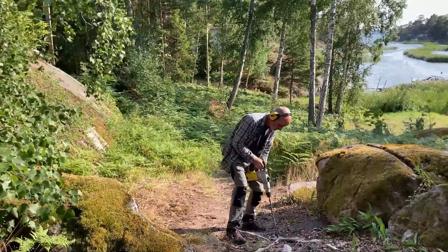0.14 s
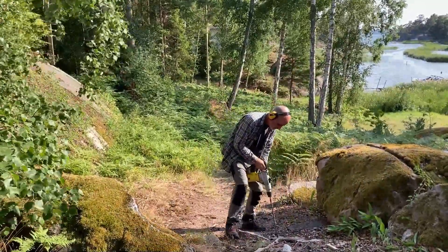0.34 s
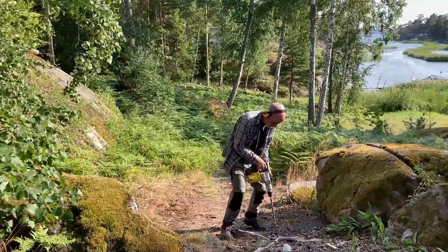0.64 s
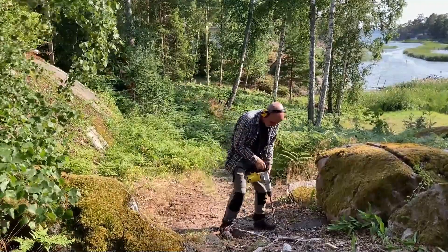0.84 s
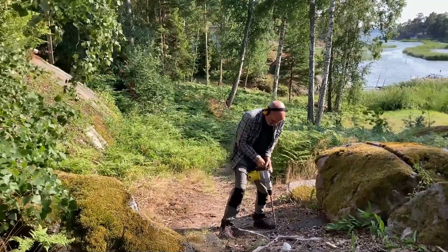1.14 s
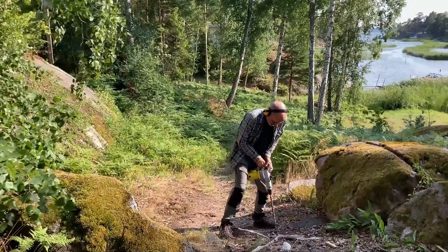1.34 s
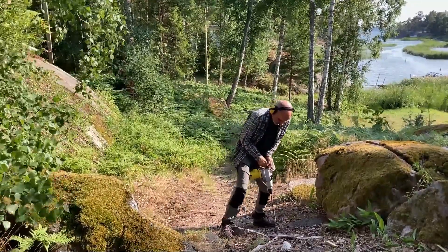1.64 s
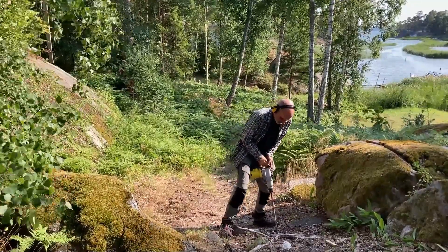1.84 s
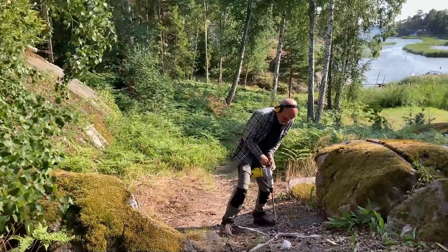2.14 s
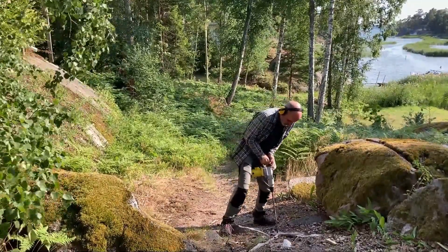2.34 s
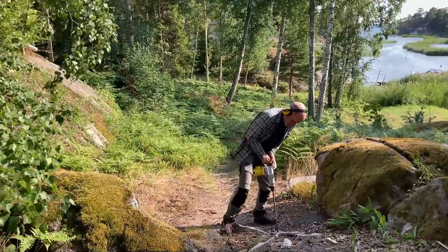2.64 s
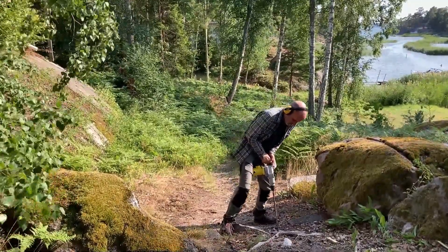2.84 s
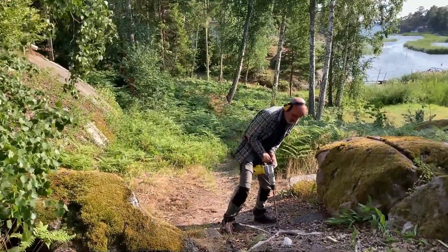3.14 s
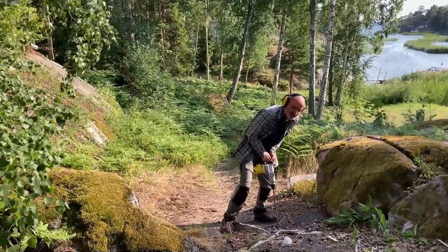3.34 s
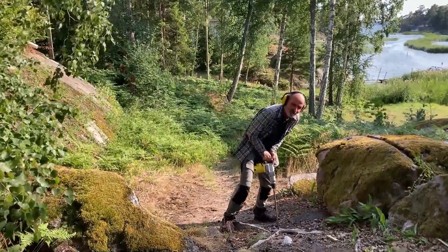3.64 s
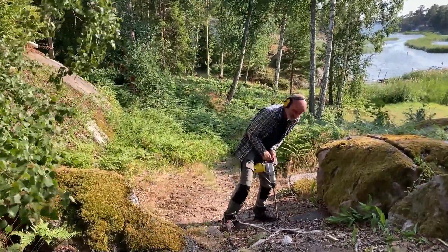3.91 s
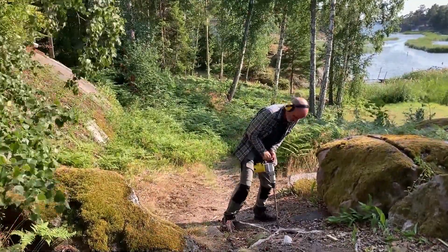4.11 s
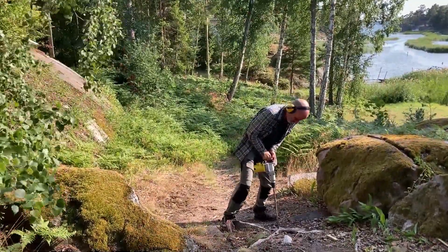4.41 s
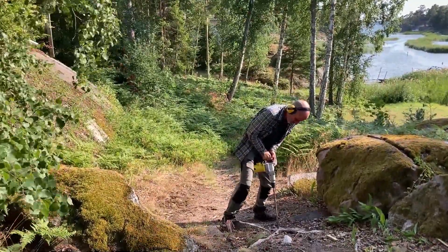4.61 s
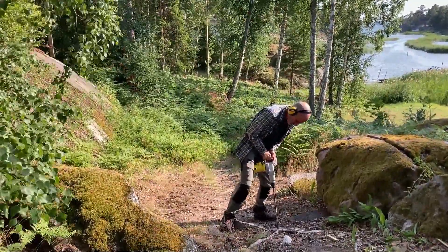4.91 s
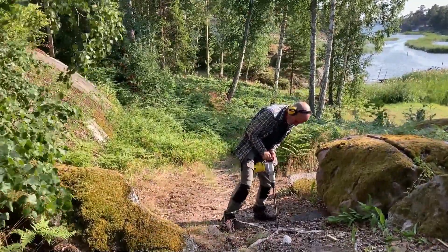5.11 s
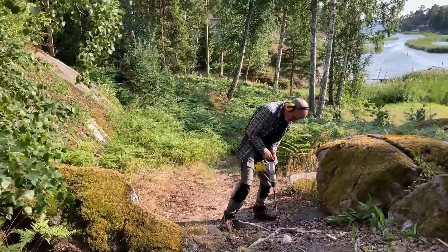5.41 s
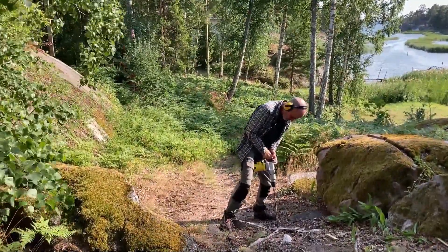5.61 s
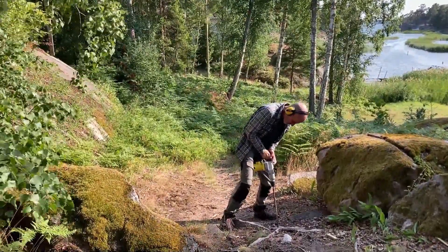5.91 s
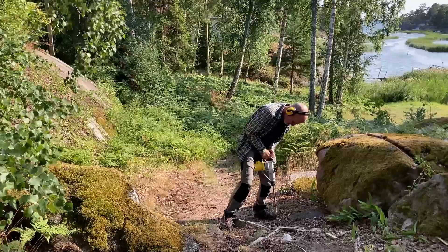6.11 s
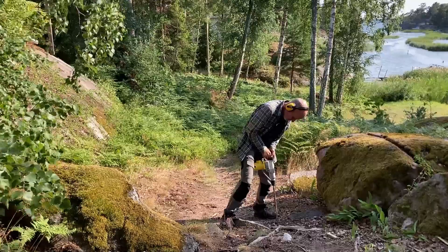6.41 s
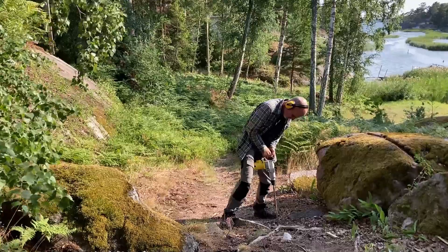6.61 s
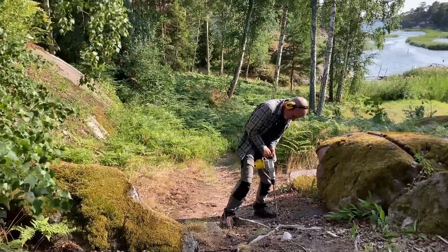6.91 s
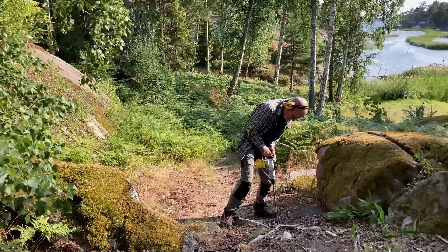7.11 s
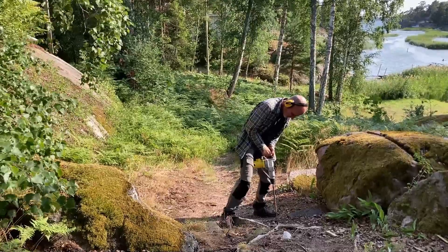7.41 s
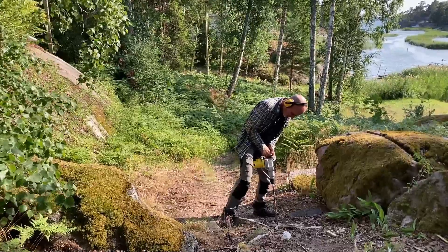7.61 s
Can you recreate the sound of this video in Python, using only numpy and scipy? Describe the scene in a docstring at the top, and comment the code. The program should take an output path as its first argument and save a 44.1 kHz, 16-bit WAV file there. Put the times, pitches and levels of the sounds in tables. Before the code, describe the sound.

Wind thumps and faint leaf rustle come first, with one small twig crack. Then a rotary hammer's motor whines upward, squealing briefly before its bit bites into bedrock. The rapid hammering, about sixty blows a second, blurs into a dense bright metallic clatter with grinding grit and thin gear whine. Deep gust slaps still hit the unshielded microphone, mostly early on. A nearby boulder adds a dull early echo; there is little other reverberation.

```python
"""An electric rotary hammer bores into bedrock: about sixty times a second a piston drives the steel bit,
which bounces and grinds, and each contact rings through resonances of steel and rock.
Before that the motor winds up with a short squeal as its gear whine sweeps through housing resonances.
Around it, gusts rumble and slap the microphone as shaped low noise and single pulses,
leaves hiss as broad noise, and a twig snaps once as a decaying burst."""
import sys
import numpy as np
from scipy import signal
from scipy.fft import rfft, irfft, next_fast_len
from scipy.io import wavfile
from scipy.ndimage import uniform_filter1d

SR = 44100
rng = np.random.default_rng(int(sys.argv[2]) if len(sys.argv) > 2 else 0)


def wav_out(sig):
    """Save sig, one row per channel (or a flat mono array), as 16-bit PCM at SR to the path in sys.argv[1]."""
    wavfile.write(sys.argv[1], SR, np.round(np.clip(np.atleast_2d(sig).T, -1, 1) * 32767).astype(np.int16))


N = 341775
TIME = np.arange(N) / SR
SIZE = next_fast_len(N + SR // 2, True)
FREQS = np.maximum(np.arange(SIZE // 2 + 1) * SR / SIZE, 1)
TRIGGER_S = 1.54
MESHES_PER_BLOW = 26


def from_db(db):
    """Logarithmic level: decibels to amplitude gain."""
    return 10 ** (np.asarray(db) / 20)


def rms_one(x):
    """Power normalisation: scale to unit rms."""
    return x / np.sqrt(np.mean(x ** 2) + 1e-20)


def in_time(rows):
    """Linear interpolation: one curve per column, a value at every sample."""
    s, *columns = np.transpose(rows)
    return [np.interp(TIME, s, column) for column in columns]


def over_hz(points):
    """Spectral envelope: levels joined by straight lines in log frequency."""
    hz, db = np.transpose(points)
    return np.interp(np.log(FREQS), np.log(hz), db)


def filtered(x, response):
    """Linear filtering: multiply the spectrum by a frequency response."""
    return irfft(rfft(x, SIZE) * response, SIZE)[..., :N]


def causal(db):
    """Minimum phase: a folded cepstrum makes the response ring only after a blow."""
    cepstrum = irfft(np.log(from_db(db)), SIZE)
    cepstrum[1:SIZE // 2] *= 2
    cepstrum[SIZE // 2 + 1:] = 0
    return np.exp(rfft(cepstrum))


def band(hz, q=1):
    """Simple resonator: unit gain at its centre, falling to both sides."""
    return 1 / (1 + 1j * (FREQS / hz - hz / FREQS) * q)


def ring(force, hz, width_hz):
    """Driven resonance: one mode excited by a force, at unit rms."""
    return rms_one(filtered(force, band(hz, hz / width_hz)))


def noise(spectrum):
    """Coloured noise: random pressure with a given spectral envelope, at unit rms."""
    return rms_one(filtered(rng.standard_normal(N), from_db(over_hz(spectrum))))


def drift(rate_hz):
    """Slow random modulation: low-passed noise of unit spread, drawn at every eighth sample."""
    slow = rfft(rng.standard_normal(SIZE // 8))
    slow = rms_one(irfft(slow / (1 + (FREQS[:len(slow)] / rate_hz) ** 2)))
    return np.interp(np.arange(N) / 8, np.arange(len(slow)), slow)


def bounded_drift(rate_hz):
    """Saturation: slow random modulation kept between -1 and 1."""
    return np.tanh(drift(rate_hz))


def fade(clicks, seconds):
    """Exponential decay: each click starts one with this time constant."""
    return signal.lfilter([1], [1, -np.exp(-1 / (seconds * SR))], clicks + 1e-18)


def swell(start_s, length_s, rise_s, fall_s):
    """Amplitude envelope of height 1: linear attack, hold, exponential release."""
    attack = np.clip((TIME - start_s) / rise_s, 0, 1)
    return attack * np.exp(-np.clip((TIME - start_s - length_s) / fall_s, 0, 30))


# level of sound given apart to left and right: frequency_hz, level_db (against the shared sound)
SIDES_SPECTRUM = [(200, -22), (700, -7), (1500, -5), (2400, -2.5), (3300, 3.5), (5800, -0.5), (6800, -4),
                  (11400, -52), (15000, -15)]
# phase of left against right in the shared sound: frequency_hz, left_lead_rad
LEFT_RIGHT_PHASE = [(0, 0), (2000, .1), (3200, 1.1), (3800, 5.4), (4700, 6.1), (5800, 7.2), (6900, 6.3),
                    (8000, 4.8), (9200, 3.14), (11400, 0), (13600, -3.14), (15600, -6.3)]


def stereo(shared, apart):
    """Interchannel phase and coherence: shared sound gets a set left-right phase, the rest is added."""
    lead = np.interp(FREQS, *np.transpose(LEFT_RIGHT_PHASE))
    apart_ratio = from_db(over_hz(SIDES_SPECTRUM))
    shared_gain = 1 / np.sqrt(1 + apart_ratio ** 2)
    left_right = np.exp(.5j * lead * np.array([[1], [-1]]))
    return filtered(shared, shared_gain * left_right) + filtered(apart, shared_gain * apart_ratio)


# colour of the leaves: frequency_hz, relative_level_db (per Hz)
LEAF_SPECTRUM = [(60, -14), (300, 2.5), (700, -2), (1500, -5.5), (2500, -5.5), (4500, -1.5), (7000, -4.5),
                 (9500, 2.5), (11000, -3.5), (13000, -17), (16000, -28)]
# cracks of a twig underfoot: start_s, level_db, decay_s
TWIG_SNAPS = [(.379, -42, 0.01)]


def forest(leaves_db=-50.0, flutter_db=2.0):
    """Broadband noise and decaying burst: leaves hiss on every side; a twig snaps."""
    apart = np.array([noise(LEAF_SPECTRUM), noise(LEAF_SPECTRUM)])
    leaves = stereo(noise(LEAF_SPECTRUM), apart)
    leaves = leaves * from_db(leaves_db + flutter_db * bounded_drift(29))
    snap = sum(from_db(db) * (TIME > s) * np.exp(-np.abs(TIME - s) / decay)
               for s, db, decay in TWIG_SNAPS)
    return leaves + snap * noise([(300, -12), (900, 8), (3200, -1), (5000, -22), (12000, -35)])


# wind rumble: frequency_hz, relative_level_db (per Hz)
RUMBLE_SPECTRUM = [(20, -38), (35, -12), (50, -3), (64, 3), (105, -5), (160, -12.5), (250, -23),
                   (400, -35.5), (800, -76)]
# light air between gusts: time_s, level_db (before the random lumps)
BREEZE_LEVEL = [(0, -36), (.9, -43), (1.8, -34.5), (2.1, -44), (3.7, -47), (4.8, -39), (6.7, -52),
                (7.75, -49)]
# gusts: start_s, length_s, level_db (before the random lumps)
GUST_EVENTS = [(0.263, 0.11, -33), (0.508, 0.32, -30.5), (0.957, 0.5, -32.5), (1.325, 0.16, -29),
               (1.52, 0.18, -27.5), (1.86, 0.1, -28.5), (2.131, 0.04, -30.5), (2.215, 0.13, -29.5),
               (2.376, 0.29, -28), (2.685, 0.18, -35.5), (2.917, .23, -40), (3.426, 0.026, -40),
               (3.879, 0.029, -33.5), (4.156, 0.29, -40.5), (4.641, 0.11, -30.5), (4.91, 0.078, -32.5),
               (5.087, 0.054, -36), (5.2, 0.052, -33.5), (5.376, 0.27, -40), (5.654, 0.061, -32),
               (5.883, 0.034, -40), (6.04, 0.035, -50), (6.18, 0.07, -42), (6.335, 0.15, -43),
               (7.29, 0.12, -39.5)]
# hard buffets: centre_s, level_db (before flutter), half_length_s, pitch_factor (on the colour below)
BUFFET_EVENTS = [(0.544, -32.5, 0.025, 0.65), (0.801, -35.5, 0.015, 1.04), (1.102, -45, 0.022, 1.3),
                 (1.403, -29, 0.077, 0.95), (2.577, -36, 0.011, 1.3)]
# buffet colour: frequency_hz (before the pitch factor), relative_level_db (per Hz)
BUFFET_SPECTRUM = [(50, -26), (130, 6), (220, 1.5), (400, -10.5), (700, -27.5), (1500, -61)]
GUST_RISE_S, GUST_FALL_S = 0.019, 0.031


def wind(evenness=0.93, lump_db=2.1, bright_hz=105, bright_power=0.22, pivot_db=-34.0,
         flutter_db=6.0, ticks_per_s=24, tick_db=9.0, tick_hz=1000):
    """Turbulent pressure: eddies rumble alike in both channels, brighter in stronger flow."""
    breeze_db, = in_time(BREEZE_LEVEL)
    gust_power = sum((from_db(db) * swell(s, length, GUST_RISE_S, GUST_FALL_S)) ** 2
                     for s, length, db in GUST_EVENTS)
    flow = np.sqrt(from_db(breeze_db) ** 2 + gust_power) * from_db(lump_db * bounded_drift(23))
    # evening out the short-term power leaves the flow in charge of the level
    eddies = noise(RUMBLE_SPECTRUM)
    eddies = rms_one(eddies / uniform_filter1d(eddies ** 2, SR // 16) ** (evenness / 2))
    small_eddies = filtered(eddies, 1 / (1 + (bright_hz / FREQS) ** 4))
    eddies = eddies + small_eddies * ((flow / from_db(pivot_db)) ** bright_power - 1)
    # hard buffets reach higher in pitch and flutter
    buffets = 0
    for s, db, half, pitch in BUFFET_EVENTS:
        bump = np.exp(-.5 * ((TIME - s) / half) ** 2)
        buffets = buffets + from_db(db) * bump * noise(np.array(BUFFET_SPECTRUM) * [pitch, 1])
    # faint ticks ride on the gusts
    ticks = filtered(rng.random(N) < ticks_per_s / SR, band(tick_hz) ** 2)
    flutter = from_db(flutter_db * bounded_drift(70))
    return flow * (eddies + from_db(tick_db) * ticks) + buffets * flutter


# single eddies that slap the microphone: start_s, peak_db, brightness_hz
THUMP_EVENTS = [(0.794, -30, 220), (0.978, -24.5, 80), (1.385, -21.5, 330), (1.405, -18.5, 60),
                (1.886, -23.5, 130), (2.274, -15, 330), (2.285, -18, 55), (2.586, -17, 55),
                (3.447, -27, 70), (4.72, -27, 70)]
# the microphone sheds the deepest bass, so each slap swings on for a few cycles
LOW_CUT_HZ = 48


def thumps():
    """Pressure pulse through a high-pass: a sharp push of air, then a deep swing."""
    low_cut = signal.butter(4, LOW_CUT_HZ, "high", fs=SR, output="sos")
    age_s = np.arange(SR // 5) / SR
    out = np.zeros(N)
    for s, db, hz in THUMP_EVENTS:
        rise = 2 * np.pi * hz * age_s
        push = signal.sosfilt(low_cut, rise ** 2 * np.exp(-rise))
        start = int(s * SR)
        out[start:start + len(age_s)] += from_db(db) * push / np.abs(push).max()
    return out


# gear whine at working speed: multiple (of the mesh rate), level_db (rms, before the common gain and fade)
WHINE_LINES = [(1, -49.5), (2, -47.5), (3, -50), (8, -45.5)]
# housing hum at working speed: multiple (of the blow rate), level_db (rms)
HUM_LINES = [(4, -59.5), (6, -65.5), (8, -63.5), (11, -55)]
# the gear whine dulls as the bit sinks into the rock
WHINE_FADE_DB_PER_S = 0.9


def motor(mesh_hz, level_db=3.6, flutter=0.00079, rough_db=1.5, swell_power=7.9):
    """Harmonic series of gear meshing: thin wavering lines over a hum, the high ones only near full speed."""
    carry_db = level_db - WHINE_FADE_DB_PER_S * (TIME - TRIGGER_S)
    angle = 2 * np.pi * np.cumsum(mesh_hz * (1 + flutter * drift(31))) / SR
    near_speed = np.minimum(mesh_hz / 1550, 1) ** swell_power
    whine = 0
    for k, db in WHINE_LINES:
        gain = from_db(db + carry_db + rough_db * drift(11)) * near_speed ** k
        whine = whine + np.sqrt(2) * gain * np.sin(k * angle)
    hum = sum(from_db(db) * np.sin(k * angle / MESHES_PER_BLOW) for k, db in HUM_LINES)
    return stereo(whine, np.array([whine, whine])) + np.sqrt(2) * near_speed * hum


def gears(angle, multiple, roughness, blur_hz):
    """Narrow-band noise around a tone: part steady whine, part smeared by chattering teeth; unit rms."""
    phase = multiple * angle
    smear = drift(blur_hz * multiple) * np.sin(phase) + drift(blur_hz * multiple) * np.cos(phase)
    return np.sqrt(2 * (1 - roughness)) * np.sin(phase) + np.sqrt(roughness) * smear


# housing resonances swept by the whine:
# multiple (of the mesh rate), resonance_hz, width_hz, level_db (rms at the peak, before roughening),
# roughness (0-1)
SQUEAL_RESONANCES = [(1, 950, 83, -36, .3), (1, 1310, 150, -41, 0.4), (2, 1940, 160, -42, .6),
                     (2, 2307, 210, -23.5, 0.46), (2, 2600, 130, -36.5, 0.2), (4, 4480, 300, -41, .7),
                     (4, 5240, 330, -37.5, 0.7), (8, 11500, 700, -48, .3)]
# brief falling whine while the bit seats: time_s, pitch_hz, level_db (rms, before roughening)
SEATING_WHINE = [(1.72, 1003, -56), (1.765, 880, -56), (1.835, 713, -46), (1.93, 630, -66)]
# the loose bit jingles until it seats
JINGLE_DB, JINGLE_S, JINGLE_FALL_S = -41, 0.31, 0.029


def spin_up(mesh_hz, lurch=0.43, steadying_s=0.3, blur_hz=55, rough_db=3.0,
            settle_s=1.0, settle_fall_s=0.21):
    """Swept excitation of resonances: the gears squeal as they pass each one; the loose bit jingles."""
    # while it is slow, the motor lurches with every stroke
    unsteady = np.exp(-np.maximum(TIME - TRIGGER_S, 0) / steadying_s)
    angle = 2 * np.pi * np.cumsum(mesh_hz) / SR
    angle = angle + lurch * unsteady * np.sin(angle / MESHES_PER_BLOW)
    squeal = 0
    for k, hz, width, db, roughness in SQUEAL_RESONANCES:
        resonance = 1 / (1 + ((k * mesh_hz - hz) / width) ** 2) ** 2
        squeal = squeal + from_db(db) * resonance * gears(angle, k, roughness, blur_hz)
    squeal = squeal * swell(TRIGGER_S, settle_s, 0.054, settle_fall_s)
    jingle_envelope = from_db(JINGLE_DB) * swell(TRIGGER_S, JINGLE_S, .003, JINGLE_FALL_S)
    jingle = jingle_envelope * ring(rng.standard_normal(N), hz=2310, width_hz=71)
    falling_hz, falling_db = in_time(SEATING_WHINE)
    seating = (TIME > SEATING_WHINE[0][0]) & (TIME < SEATING_WHINE[-1][0])
    falling_tone = np.sqrt(2) * np.sin(2 * np.pi * np.cumsum(falling_hz) / SR)
    falling = seating * from_db(falling_db) * falling_tone
    roughening = from_db(rough_db * np.array([drift(108), drift(110)]))
    return (squeal + falling) * roughening + jingle


BOULDER_S, BOULDER_DB = .0086, -14.5


def boulder(x):
    """Specular reflection: the rock face beside the drill returns one dull early echo."""
    delay = np.exp(-2j * np.pi * FREQS * BOULDER_S)
    return x + from_db(BOULDER_DB) * filtered(x, delay / (1 + (FREQS / 6000) ** 2))


# free bending modes of the shank: frequency_hz, width_hz, level_db (against the rattle), flicker_db
SHANK_MODES = [(3270, 130, -17.5, 5), (4705, 95, -14.5, 4.5)]
# the shank rubs the side of the hole: start_s, length_s, level_db
RUB_EVENTS = [(2.22, .4, -43), (5.65, 0.81, -47), (6.4, 0.47, -39.5)]
RUB_RISE_S, RUB_FALL_S = 0.057, 0.086


def shank(force, strength_db, pan_db=-0.5):
    """Bending modes of a bar: the long shank sings above the rattle, its highest mode when it rubs."""
    free = 0
    for hz, width, db, flicker_db in SHANK_MODES:
        gain = from_db(strength_db + db + flicker_db * bounded_drift(60))
        free = free + gain * ring(force, hz, width)
    rubbing = sum(from_db(db) * swell(s, length, RUB_RISE_S, RUB_FALL_S) for s, length, db in RUB_EVENTS)
    rubbed = rubbing * ring(force, hz=5295, width_hz=130)
    return (free + rubbed) * from_db([[pan_db], [-pan_db]])


def strikes(turns, offset, jitter_s, spread_db):
    """Impulse train: one click per piston stroke, uneven in time and force within bounds."""
    at_s = np.interp(np.arange(1, int(turns[-1])) + offset, turns, TIME)
    chance = rng.uniform(-1, 1, (len(at_s), 2))
    samples = ((at_s + jitter_s * chance[:, 0]) * SR).astype(int)
    clicks = np.zeros(N)
    clicks[np.clip(samples, 0, N - 1)] = from_db(spread_db * chance[:, 1])
    return clicks


# blows that land square on hard rock: time_s, strength_db (of the click, over the rattle, before filtering)
HARD_BLOW_EVENTS = [(2.671, 25), (3.204, 31), (3.9627, 27), (4.1945, 25), (4.787, 30), (4.8705, 28),
                    (5.101, 25), (5.301, 31), (5.365, 30), (5.632, 29), (6.7155, 28), (6.8276, 30),
                    (6.8925, 24), (7.464, 25)]
# the crack of a blow over its chatter
CRACK_DB = 22
# the tip skips and strikes again straight after each crack
SKIP_S, SKIP_SPREAD_S, SKIP_DB = .0014, .0006, -6


def contact_force(mesh_hz, seated_db, rebound_db=-3.5, crack_hz=2500, chatter_s=0.007, grind_db=-6.5):
    """Impact excitation: blows, rebounds and grinding at the tip of the bit."""
    turns = np.cumsum(mesh_hz * (TIME > TRIGGER_S)) / SR / MESHES_PER_BLOW
    blows = strikes(turns, offset=.5, jitter_s=.00012, spread_db=3.8)
    # the bit springs back against its holder half a stroke later
    blows = blows + from_db(rebound_db) * strikes(turns, offset=-.03, jitter_s=.0007, spread_db=3.8)
    skips = strikes(turns, offset=.5, jitter_s=SKIP_SPREAD_S, spread_db=4.2)
    skips = np.roll(skips, int(SKIP_S * SR))
    # each contact is a crack followed by a few milliseconds of chatter and crushed grit
    steely = band(crack_hz)
    crack = from_db(CRACK_DB) * filtered(blows + from_db(SKIP_DB) * skips, steely)
    chatter = fade(blows, chatter_s) * rng.standard_normal(N)
    grinding = from_db(grind_db) * rng.standard_normal(N)
    force = from_db(seated_db) * (crack + chatter) + grinding
    # short-term levelling: feed then alters the balance of blows and grinding
    rattle = force / np.sqrt(uniform_filter1d(force ** 2, SR // 8))
    hard = sum(from_db(db) * (np.arange(N) == int(s * SR)) for s, db in HARD_BLOW_EVENTS)
    return rattle + filtered(hard, steely)


# broad colour of drill and rock: frequency_hz, relative_level_db (per Hz)
DRILL_SPECTRUM = [(100, -33), (250, -13.5), (400, -17), (610, -16.5), (670, -6.5), (1000, 0.5), (1450, -3),
                  (2400, 2.5), (4000, -3.5), (5600, -5), (7400, -0.5), (9700, -7.5), (12300, -6),
                  (15800, -21.5)]
# resonances and gaps of bit and housing: frequency_hz, width_hz, level_db (over the broad colour)
STEEL_MODES = [(256, 20, 5.5), (400, 63, 5.5), (492, 18, 2), (673, 37, 6), (902, 120, 3.5), (1310, 68, 6),
               (1341, 36, -11), (1510, 29, -7), (1585, 60, 3), (1780, 17, 0), (2215, 33, 7.5),
               (2294, 60, 5.5), (2570, 140, 4.5), (2860, 60, 4.5), (3040, 100, -3.5), (3300, 470, 3.5),
               (3480, 37, 2), (3740, 33, 10), (4100, 50, 5), (4520, 206, 7.5), (5330, 85, 10.5),
               (5350, 280, -7), (10270, 1030, 4.5), (12300, 350, 1)]
# how firmly the man leans on the drill: time_s, feed_db (shifts the blows against the grinding)
FEED_LEVEL = [(2.2, -4.5), (2.7, 0.5), (3.0, -1.5), (3.85, 1), (4.7, 0.5), (5.3, 4.5), (6.1, 0), (7.75, 0)]
# the bit catches solid rock (+) or slips in dust (-):
# start_s, length_s, crunch_db (treble), catch_db (clang, and blows against grinding)
BITE_EVENTS = [(1.88, 0.033, -1.5, 2), (1.93, 0.062, -0.5, -3), (2.593, 0.21, 0.5, 1.5),
               (2.86, 0.19, 0, -1), (3.176, 0.16, 1, 2), (3.37, 0.17, -2, 0.5), (4.71, .07, -1, -1),
               (4.91, 0.035, -1, -2), (5.05, 0.06, 0.5, 1), (6.53, 0.24, 1.5, -0.5), (6.79, 0.07, 1, 0.5),
               (7.37, 0.13, -0.3, 1.5)]
# treble crunch: time_s, level_db (before bites and flicker)
CRUNCH_LEVEL = [(1.8, 2), (2.6, 0), (3.8, 2), (4.7, 0), (5.6, 1.5), (6.75, 0), (7.2, 0), (7.75, 1.5)]
BITE_RISE_S, BITE_FALL_S = 0.0056, 0.034
# blows at neutral feed, and dB gained per dB of feed and per dB of a bite's crunch
BLOW_DB, FEED_FOLLOWS, BITE_FOLLOWS = -24, 0.19, 0.59
# decay of the blurred sound that differs between left and right
BLUR_S = 0.0049


def hammer(mesh_hz, crunch_hz=5500, crunch_flicker_db=0.6, clang_hz=2450, clang_db=0.23,
           clang_flicker_db=1.2, speed_power=1.9):
    """Source and filter: sharp blows and their blurred copies ring through modes of steel and rock."""
    feed_db, = in_time(FEED_LEVEL)
    crunch_db, = in_time(CRUNCH_LEVEL)
    bite_db, catch_db = sum(np.outer(dbs, swell(s, length, BITE_RISE_S, BITE_FALL_S))
                            for s, length, *dbs in BITE_EVENTS)
    strength_db = BLOW_DB + FEED_FOLLOWS * feed_db + BITE_FOLLOWS * bite_db
    force = contact_force(mesh_hz, feed_db + catch_db)
    # noise follows the smoothed energy of the blows, drawn apart for left and right
    blurred = rms_one(np.sqrt(fade(force ** 2, BLUR_S)) * rng.standard_normal((2, N)))
    force = stereo(boulder(force), blurred)
    modes_db = sum(db / (1 + (2 * (FREQS - hz) / width) ** 2) for hz, width, db in STEEL_MODES)
    ringing = rms_one(filtered(force, causal(over_hz(DRILL_SPECTRUM) + modes_db)))
    # no two blows land alike, so the main clang of the bit comes out stronger or weaker
    clang = filtered(ringing, np.exp(-((FREQS - clang_hz) / 600) ** 2))
    clang_gain = from_db(clang_db + catch_db + clang_flicker_db * bounded_drift(46.9))
    ringing = rms_one(ringing + clang * (clang_gain - 1))
    # fresh rock crunches brightly, packed dust dulls the bit
    treble = filtered(ringing, 1 / (1 + (crunch_hz / FREQS) ** 8))
    crunch_gain = from_db(crunch_db + bite_db + crunch_flicker_db * bounded_drift(52))
    ringing = ringing + treble * (crunch_gain - 1)
    # the rattle grows with speed while the motor winds up
    wind_up = (mesh_hz / mesh_hz.max()) ** speed_power
    return wind_up * (from_db(strength_db) * ringing + shank(force, strength_db + bite_db))


# the motor winds up, then wavers a little with the load: time_s, gear_mesh_hz
MOTOR_SPEED = [(1.54, 680), (1.6, 870), (1.635, 950), (1.675, 1115), (1.75, 1198), (1.8, 1285),
               (1.86, 1365), (2.0, 1452), (2.12, 1502), (2.3, 1538), (2.6, 1556), (3.5, 1577), (5.3, 1576),
               (5.8, 1616), (6.19, 1587), (6.45, 1588), (6.8, 1612), (7.2, 1588), (7.75, 1607)]


def scene(attack_s=0.019):
    """Linear superposition: the drill runs once the trigger is pulled, amid wind and leaves."""
    mesh_hz, = in_time(MOTOR_SPEED)
    trigger = np.clip((TIME - TRIGGER_S) / attack_s, 0, 1)
    drill = hammer(mesh_hz) + motor(mesh_hz) + spin_up(mesh_hz)
    return trigger * drill + wind() + thumps() + forest()


CUTOFF_HZ = 15800


def record(dry):
    """Band limiting: an elliptic low-pass cuts the top steeply."""
    return signal.sosfilt(signal.ellip(12, .1, 80, CUTOFF_HZ, fs=SR, output="sos"), dry)


dry = scene()
out = record(dry)
wav_out(out)
```